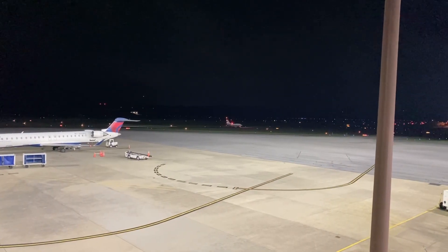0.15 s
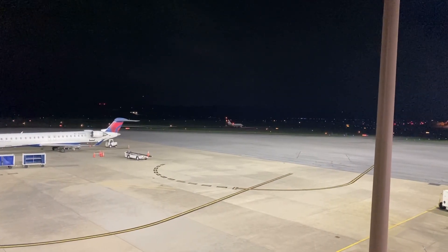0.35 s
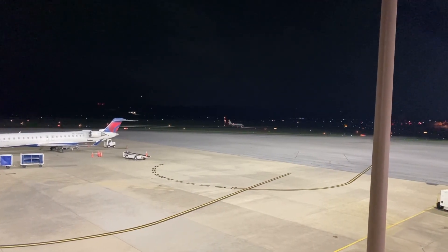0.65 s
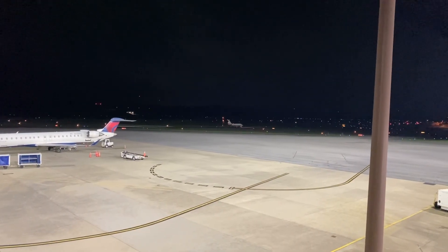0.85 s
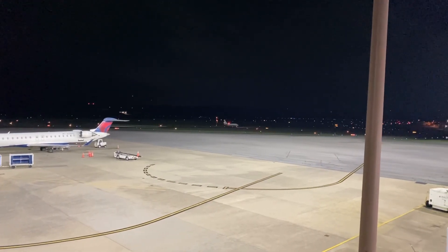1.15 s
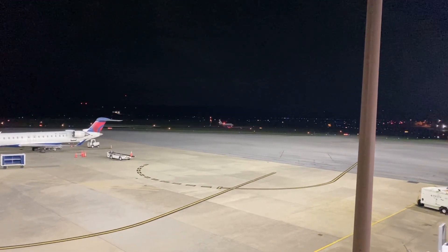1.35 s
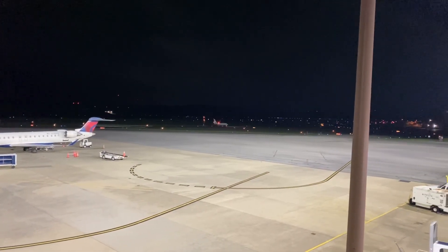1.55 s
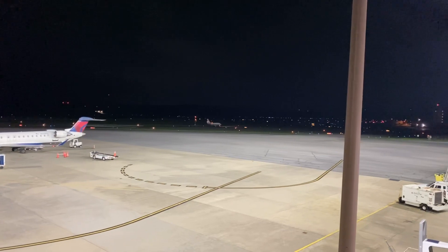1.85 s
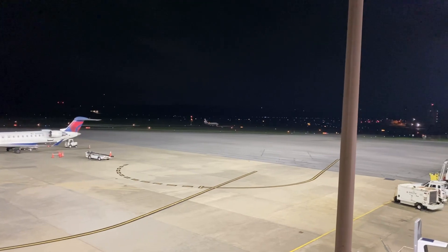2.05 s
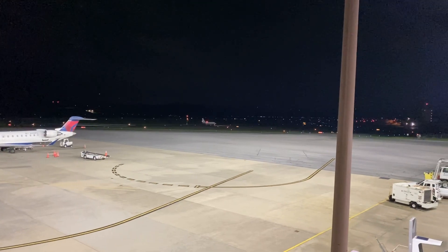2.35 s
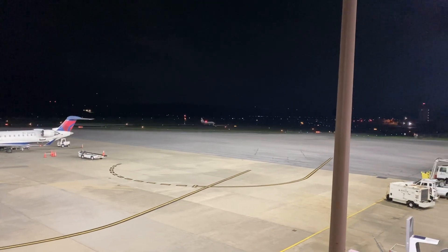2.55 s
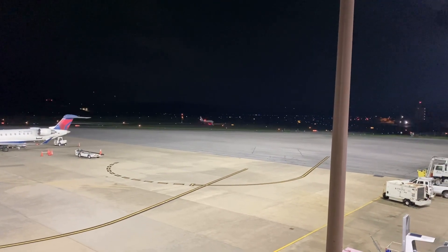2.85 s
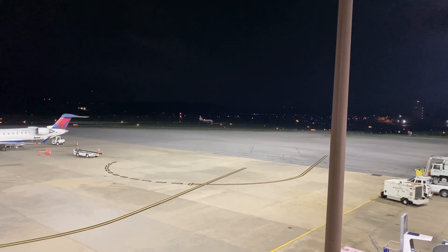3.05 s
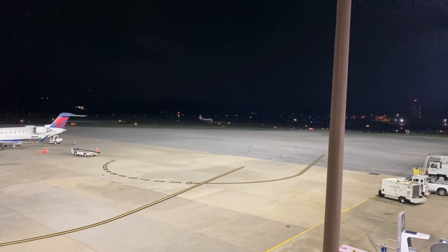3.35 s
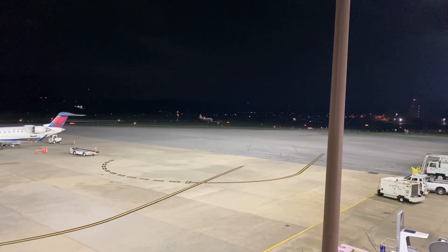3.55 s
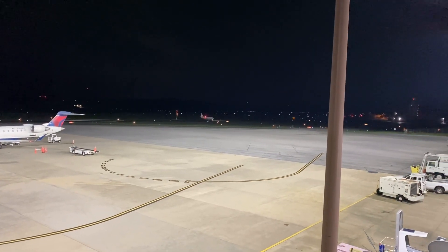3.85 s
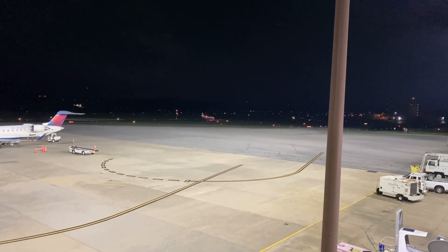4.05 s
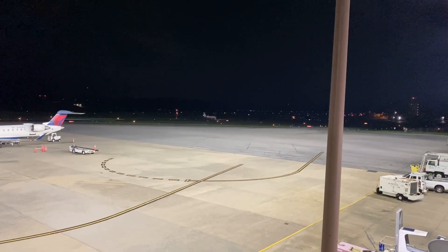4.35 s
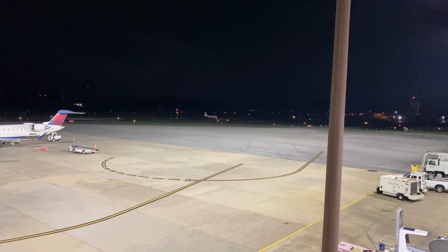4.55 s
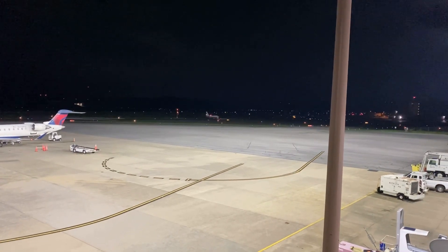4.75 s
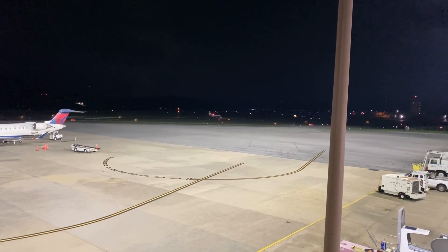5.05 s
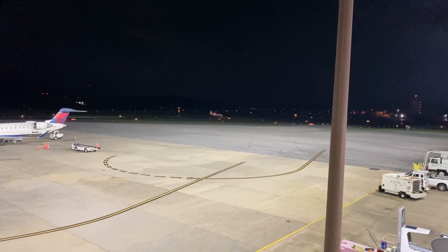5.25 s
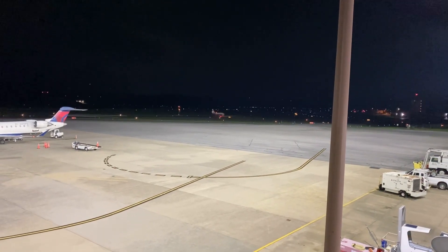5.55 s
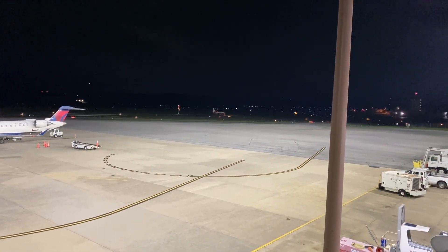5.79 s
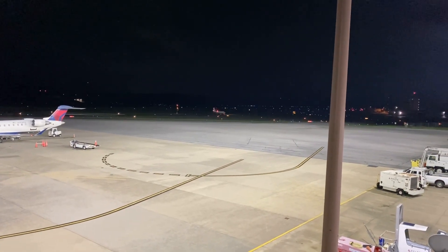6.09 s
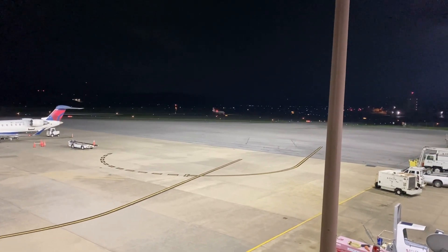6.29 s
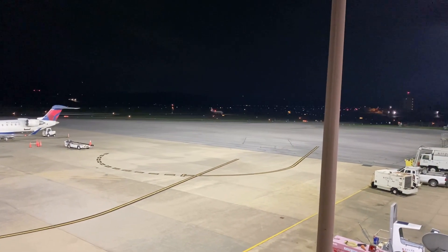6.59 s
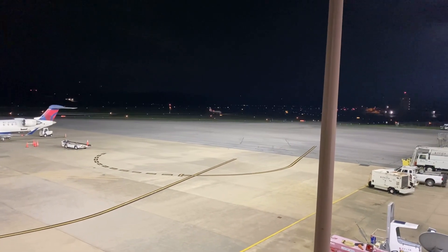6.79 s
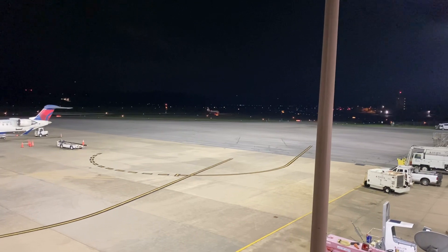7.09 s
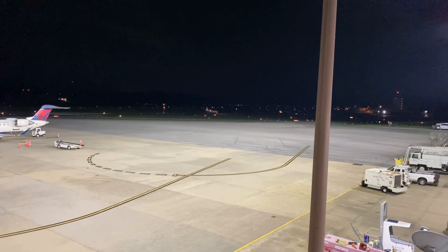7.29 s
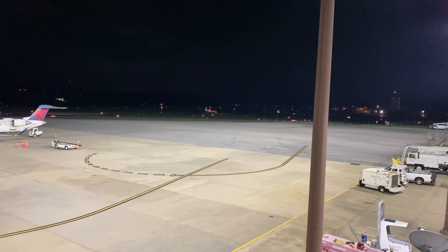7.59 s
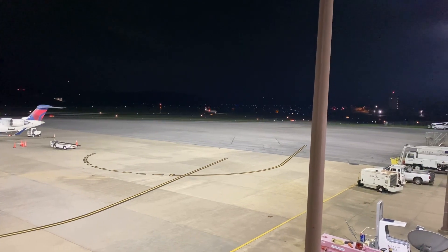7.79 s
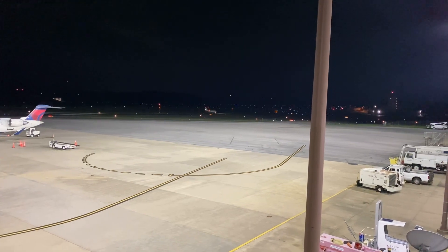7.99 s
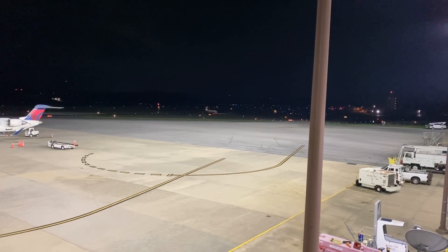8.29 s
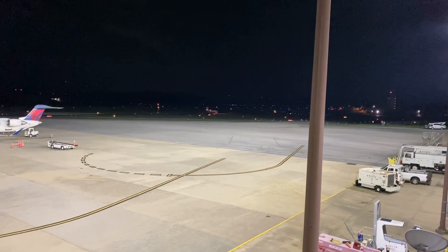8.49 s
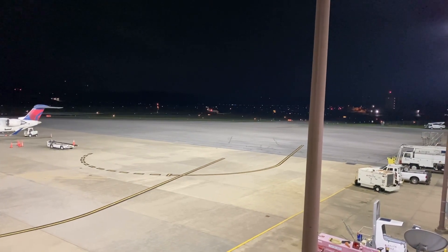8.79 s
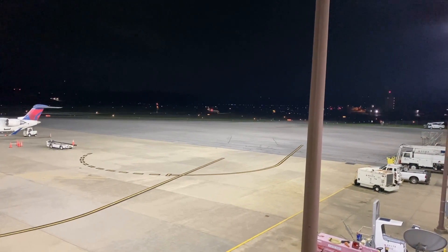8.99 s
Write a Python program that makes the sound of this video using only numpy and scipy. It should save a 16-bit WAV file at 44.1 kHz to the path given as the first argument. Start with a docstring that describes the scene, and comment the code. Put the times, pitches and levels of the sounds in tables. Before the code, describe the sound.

Steady exhaust noise from far-off parked jets, heard on a phone. A loud, stuttering whine opens the scene and fades within a second into sinking hiss; a faint handling bump follows. High whistling drifts in and out over the rush. Midway the whine chirps up again for an instant, hiss climbs, and the engines continue without a clear ending.

```python
"""Idling jet engines

Jet engines idle far off on an airport apron, heard by a phone. Exhaust noise, shaped in bands, rushes on.
A fan whine and a high turbine whistle, both tones with wavering levels, swell and fade in the moving air.
Twice the fan whine flares up, flutters and rasps. Sliding bands of noise make hiss: one sinks after the
first flare, one climbs after the second. Puffs of noise, faint gliding streaks and one soft bump join in.
"""
import sys
import numpy as np
from scipy import signal
from scipy.fft import rfft, irfft, next_fast_len
from scipy.io import wavfile
from scipy.ndimage import map_coordinates

SR = 44100
rng = np.random.default_rng(int(sys.argv[2]) if len(sys.argv) > 2 else 0)


def generate_wav(sig):
    """Save sig (samples, or channels by samples) to the path in sys.argv[1] as 16-bit PCM at SR."""
    pcm = np.round(np.clip(np.atleast_2d(sig).T, -1, 1) * 32767).astype(np.int16)
    wavfile.write(sys.argv[1], SR, pcm)


N = 402633
T = np.arange(N) / SR
COARSE_T = T[::32]  # slow level curves are worked out here, then joined by straight lines

# colour of the exhaust rush, before its overall level is set: (f/Hz, relative level per Hz/dB)
RUSH = [(25, -28), (85, -15), (150, -3.5), (270, -0.5), (390, -3), (720, -1.5), (1250, -5.5), (1650, -3),
        (3100, -2.5), (4150, -4.5), (4750, -10.5), (6300, -12), (8200, -22), (11000, -39.5)]
# rise and fall of the rush: (t/s, body level/dB, treble level/dB)
FLOW = [(0, 0, 0.5), (.35, 1, 1), (.65, 0.5, 3), (2.0, -1.5, -1.5), (3.8, -1, 1), (4.55, -0.5, 1),
        (4.8, -0.5, -5), (5.25, 0.5, -4.5), (5.6, 0, 1.7), (7.5, -1.3, -0.5), (9.13, -2.5, 2)]
# extra rise and fall of the rush's middle: (t/s, level/dB)
MIDDLE = [(0, .8), (1.7, 1), (2.2, -1), (4.1, -2), (4.6, -0.5), (8.2, 0.5), (9.13, 2)]
MIDDLE_HZ, MIDDLE_OCTAVES = 1250, 0.35  # centre and half-width of that middle

# brief whistling streaks in the rush: pitch range, then the usual level and its spread
STREAK_LOW_HZ, STREAK_HIGH_HZ, STREAK_DB, STREAK_SPREAD_DB = 2103, 4302, -63, 3
STREAK_HALF_S, STREAK_GLIDE_HZ_PER_S = 0.015, 1200  # typical half-length, spread of the glides

# gusts of sliding hiss: (middle t/s, level/dB, half-length/s, from f/Hz, to f/Hz, slide time/s)
SWISHES = [(0.682, -56, 0.18, 2294, 1300, .3), (5.62, -54, 0.84, 1596, 3305, .3)]
# thin top hiss that comes in late: (middle t/s, level/dB, half-length/s)
SIZZLE_SWELL = [(8.3, -73, 0.94)]
# short puffs of noise: (middle t/s, level/dB, centre f/Hz, width f/Hz, half-length/s)
PUFFS = [(0.147, -49.5, 750, 340, 0.044), (0.482, -42, 2200, 260, .011), (.578, -48, 2280, 220, 0.015),
         (0.647, -50.5, 780, 280, 0.015), (0.832, -49, 960, 220, .009), (1.008, -47, 1450, 220, .005),
         (1.028, -43, 746, 199, .0063), (4.503, -50, 1580, 300, .018), (4.486, -50.5, 2740, 260, .008),
         (4.445, -48, 1950, 260, .008), (4.6, -48, 2050, 420, .03), (5.339, -46, 1880, 200, .008),
         (5.588, -48, 2630, 380, 0.026), (5.633, -49, 765, 150, .015), (5.855, -53, 786, 168, 0.018),
         (6.105, -35, 3170, 260, 0.003), (6.115, -43, 3180, 520, .014), (6.13, -45, 2650, 200, .008),
         (6.22, -48.5, 3050, 700, .025), (6.448, -42.5, 3050, 200, .007)]
# dull modes of a soft bump of the hand on the phone: (f/Hz, level/dB)
BUMP_MODES = [(40, -66), (80, -65), (135, -51), (175, -44)]
BUMP_S, BUMP_HALF_S = 1.649, .009

# weaker machine tones: (f/Hz, level/dB, half-width of the line f/Hz)
TONES = [(161.8, -72.5, 14), (214.5, -71.5, 9), (265.4, -68.5, 7.4), (534.5, -67.5, 12), (712.5, -64.5, 33),
         (994, -67.5, 57), (1415, -67.5, 50), (2825, -68.5, 9)]
# low hum that stands out for a while: (middle t/s, level/dB, half-length/s)
HUM_SWELL = [(5.85, -60.5, 0.7)]
HUM_HZ, HUM_DB = 769, -67.5
# two close whines that beat together: (f/Hz, usual level/dB, share of each spell: level/dB)
PAIR_WHINES = [(3133, -62, -7.5), (3170, -71.5, -2)]
# spells in which the wind carries that pair over: (start t/s, length/s, level before the share/dB)
PAIR_SPELLS = [(.92, 0.17, -52.5), (5.68, 0.27, -55), (6.02, .075, -46), (6.28, .07, -50), (6.41, .05, -51),
               (6.49, 0.061, -47), (6.67, 0.074, -54), (7.02, 0.17, -53), (7.4, 0.68, -59.5),
               (8.45, 0.32, -60)]

# turbine whistle: its pitch, and the shaft rate that spaces its sidebands
WHISTLE_HZ, SHAFT_HZ = 5071.5, 710.5
# level between swells, spread of its random fading, fades a second
WHISTLE_DB, WHISTLE_FADE_DB, WHISTLE_FADES_PER_S = -53.5, 0.5, 13
# spells in which the wind carries the whistle over: (start t/s, length/s, level/dB)
WHISTLE_SWELLS = [(.15, 0.086, -42.5), (.26, 0.071, -51), (.468, 0.024, -39), (.58, 0.15, -58),
                  (1.02, .05, -55), (1.38, 0.069, -51.5), (1.69, 0.042, -41), (1.96, 0.069, -47),
                  (2.3, 0.32, -49.5), (2.88, 0.3, -44), (3.38, 0.043, -56), (3.62, 0.11, -65),
                  (4.13, 0.19, -52), (4.68, 0.36, -48), (5.12, 0.2, -46), (5.38, 0.19, -54),
                  (5.72, 0.2, -47), (6.12, 0.073, -48), (6.55, 0.55, -58.5), (7.17, 0.15, -54.5),
                  (7.41, 0.062, -52), (7.59, 0.077, -61), (7.78, .19, -51), (8.11, 0.061, -55),
                  (8.28, .06, -67), (8.74, 0.16, -55.5)]
# the whistle drops out briefly when its paths cancel: (t/s, change in level/dB)
DROPOUTS = [(.05, -10), (.95, -8), (1.14, -15), (1.3, -9), (1.52, -12), (1.88, -15), (2.17, -15), (3.3, -8),
            (3.53, -9), (3.83, -15), (4.4, -13), (4.48, -10), (4.54, -5), (7.35, -3), (7.54, -3),
            (8.04, -12), (8.21, -6), (8.4, -6), (8.52, -6), (8.69, -9), (9.03, -13)]
# noisy skirt that the air spreads round the whistle: (width f/Hz, level relative to the tone/dB)
WHISTLE_SKIRT = [(70, -11.5), (240, -15)]
# the whistle's sidebands: (shaft rates above it, usual level/dB)
SIDEBANDS = [(-1, -63.5), (1, -66.5)]
SIDEBAND_FADE_DB, SIDEBAND_FADES_PER_S = 1, 4
# the sidebands swell by themselves: (shaft rates above the whistle, start t/s, length/s, level/dB)
SIDEBAND_SWELLS = [(-1, 0.43, .3, -63), (1, .5, 0.2, -58.5), (-1, 1.33, .15, -61), (-1, 2.6, .35, -64),
                   (1, 2.64, 0.13, -58), (1, 3.01, 0.24, -59), (-1, 3.52, .65, -56.5),
                   (1, 3.55, 0.45, -63.5), (-1, 4.4, .13, -58), (1, 5.38, 0.16, -58), (-1, 5.45, 0.13, -62),
                   (-1, 5.8, 0.23, -60), (-1, 6.88, 0.19, -56.5), (-1, 6.9, .18, -59),
                   (1, 7.62, 0.98, -64.5), (-1, 7.9, 0.23, -55), (-1, 8.3, .08, -58), (-1, 8.56, .14, -60)]
# tones of a second blade row: (shaft rates above its own pitch, relative level/dB)
ROW = [(-1, -3), (0, -0.5), (1, -17.5), (2, -14.5)]
ROW_HZ, ROW_DB = 7876, -74  # its pitch, and its level between swells before the relative levels
# swells of the second row, before the relative levels: (start t/s, length/s, level/dB)
ROW_SWELLS = [(.78, .14, -75), (2.0, .04, -65), (2.7, .09, -66), (3.1, .07, -67), (5.13, 0.091, -72),
              (7.18, .04, -65), (8.05, 0.087, -71), (8.44, 0.31, -64)]

# side tones that flare beside the fan whine, a rasp: (start t/s, length/s, f/Hz, level/dB)
RASPS = [(.04, 0.19, 2154, -54), (.2, .04, 2440, -54), (.278, .06, 1954, -43.5), (.365, .02, 2150, -46),
         (.42, .025, 2530, -52), (.455, .035, 2160, -41), (.47, 0.026, 2330, -47), (.5, 0.1, 2180, -48),
         (.59, .025, 1416, -51), (4.47, .05, 1420, -52), (4.482, .06, 2600, -52), (4.57, 0.077, 2600, -56),
         (4.57, .12, 1404, -57.5)]
# fan blade-passing rate, drifting slowly: (t/s, f/Hz)
FAN_PITCH = [(0, 2036), (2.2, 2045), (4.6, 2028), (7.3, 2015), (8.4, 2026), (9.13, 2027)]
# level between swells, spread of its random fading, fades a second
FAN_DB, FAN_FADE_DB, FAN_FADES_PER_S = -59, 2, 6
# spells in which the wind carries the fan whine over: (start t/s, length/s, level/dB)
FAN_SWELLS = [(.01, .155, -33), (.17, .09, -36.5), (.312, 0.052, -32), (.405, .08, -33), (.5, 0.098, -36.5),
              (.61, 0.024, -40.5), (.65, 0.079, -49.5), (1.25, .09, -57), (2.3, 0.31, -51.5),
              (2.82, 0.23, -57.5), (3.57, 0.24, -51.5), (3.97, 0.15, -56), (4.35, 0.43, -50.5),
              (4.433, 0.021, -36), (4.474, 0.064, -33.5), (4.575, 0.089, -37.5), (4.695, .03, -44),
              (4.725, 0.041, -40), (4.79, 0.026, -48.5), (5.053, 0.62, -51.5), (6.798, 0.7, -56),
              (7.6, 0.22, -50.5), (8.15, 0.29, -51)]
# eddies focus the fan whine for an instant: (middle t/s, level/dB)
FLARES = [(.055, -28), (.138, -37), (.198, -33), (.28, -35), (.292, -32), (.318, -33), (.343, -30),
          (.375, -31), (.427, -28), (.442, -29), (.457, -31), (.468, -23.8), (.476, -28), (.486, -30),
          (.574, -33), (4.443, -30), (4.503, -38), (4.516, -35), (4.578, -29.5), (4.607, -27),
          (4.646, -29.5), (4.761, -39)]
# the fan whine stutters too, more quickly: (t/s, change in level/dB)
FAN_DROPOUTS = [(.072, 0), (.181, 0), (.269, -10), (.305, -8), (.392, -1), (.499, -2), (4.463, -1),
                (4.556, -2), (4.594, -7), (4.628, -5), (4.677, -9), (4.78, -8)]
# noisy skirt that the air spreads round the fan whine: (width f/Hz, level relative to the tone/dB)
FAN_SKIRT = [(130, -21), (380, -21)]
FLARE_HALF_S, DROPOUT_HALF_S, FAN_DROPOUT_HALF_S = 0.0052, .02, .0038
# eddies shake the fan whine's pitch: spread, shakes a second
FAN_JITTER_HZ, FAN_JITTERS_PER_S = 11, 190

# rise and fall time of a spell: (shortest/s, added share of the spell's length)
FAN_EDGE, WHISTLE_EDGE = (0.0042, 0.092), (0.026, 0.078)
SIDEBAND_EDGE, PAIR_EDGE, RASP_EDGE = (0.042, .1), (.012, .1), (0.0045, 0)
TOP_HZ = 10950  # the phone passes sound up to here


def undb(db):
    """Turn decibels into gain."""
    return np.exp(np.asarray(db) * (np.log(10) / 20))


def unit(x):
    """Scale to an rms (average strength) of 1."""
    return x * np.sqrt(len(x) / np.vdot(x, x).real)


def curves(table):
    """Join each column of a time table by straight lines."""
    times, *columns = np.transpose(table)
    return [np.interp(T, times, column) for column in columns]


def bell(x, centre, half):
    """Rounded (Gaussian) swell of height 1."""
    return np.exp(-.5 * np.minimum(((x - centre) / half) ** 2, 100))


def walk(rate):
    """Smooth random wandering with spread 1, built from about `rate` chance values a second."""
    points = rng.standard_normal(8192)
    steps = np.arange(0, N + 32, 32)
    smooth = map_coordinates(points, [steps / SR * rate], order=3, mode="wrap")
    return unit(np.interp(np.arange(N), steps, smooth))


def scatter(width_hz):
    """Random turning of level and phase spreads a tone into a band about this wide, up to some 1400 Hz."""
    return unit(walk(width_hz) + 1j * walk(width_hz))


def twinkle(width_hz, steady=0.68):
    """Envelope of a tone whose direct path and many scattered paths add up; rms 1."""
    return unit(steady + scatter(width_hz))


def through_air(skirt, flutter_db, flutter_rate):
    """Envelope of a tone that crossed turbulent air: its level flutters and it gains a noisy skirt."""
    direct = unit(undb(flutter_db * walk(flutter_rate)))
    return unit(direct + sum(undb(db) * scatter(width) for width, db in skirt))


def carry(envelope, hz):
    """Put a complex envelope on a steady or gliding pitch, keeping its rms."""
    turns = np.cumsum(hz + np.zeros(N)) / SR
    phase = (2 * np.pi * (turns - np.floor(turns))).astype(np.float32)
    return np.sqrt(2) * (envelope.real * np.cos(phase) - envelope.imag * np.sin(phase))


def dips(table, half):
    """Gain of a tone that drops out for an instant now and then."""
    change_db = sum(db * bell(COARSE_T, s, half) for s, db in table)
    return undb(np.interp(T, COARSE_T, change_db))


def swells(usual_db, table):
    """Gain of a sound that rests at a usual level and rises in rounded swells; their powers add."""
    power = sum((undb(db) * bell(COARSE_T, s, half)) ** 2 for s, db, half in table)
    return np.sqrt(undb(usual_db) ** 2 + np.interp(T, COARSE_T, power))


def carried(table, edge):
    """Gain of a tone that the wind carries over in spells: each rises, holds and dies away."""
    shortest, share = edge
    spells = []
    for start, length, db in table:
        outside = abs(COARSE_T - start - length / 2) - length / 2  # seconds before or after the hold
        fade = np.clip(outside / (shortest + share * length), 0, 20)
        spells.append(undb(db) * np.exp(-fade))
    return np.interp(T, COARSE_T, np.max(spells, axis=0))


def rush(body_db=-48, flicker_db=1.06, drift_db=.5, treble_flutter_db=0.7, crossover_hz=4600):
    """Exhaust turbulence: noise in half-octave bands that swell together but drift and flicker alone."""
    body, treble = curves(FLOW)
    (middle,) = curves(MIDDLE)
    treble = treble + treble_flutter_db * walk(22)
    hz, db = np.transpose(RUSH)
    size = next_fast_len(N, real=True)
    freqs = np.maximum(np.arange(size // 2 + 1) * SR / size, 1)
    colour = undb(np.interp(np.log(freqs), np.log(hz), db))
    spectrum = rfft(rng.standard_normal(size)) * colour
    spectrum /= np.std(irfft(spectrum, size))
    band_of = np.floor(2 * np.log2(np.maximum(freqs, 100)))  # the lowest pitches share one band
    out = np.zeros(N)
    for band in np.unique(band_of):
        octave = (band + .5) / 2
        high = 1 / (1 + (crossover_hz / 2 ** octave) ** 4)  # 0 in the body, 1 in the treble
        swell = (1 - high) * body + high * treble
        swell = swell + middle * bell(octave, np.log2(MIDDLE_HZ), MIDDLE_OCTAVES)
        swell = swell + flicker_db * walk(16) + drift_db * walk(2.015)
        out = out + irfft(spectrum * (band_of == band), size)[:N] * undb(swell)
    return out * undb(body_db)


def streaks(count=420):
    """Scraps of blade noise that the air lets through for an instant, each a faint gliding tone."""
    out = np.zeros(N)
    chances = zip(rng.random((count, 3)), rng.standard_normal((count, 3)))
    for (when, pitch, turn), (size, glide, stretch) in chances:
        span = slice(max(int(when * N) - SR // 10, 0), int(when * N) + SR // 10)
        t = T[span] - when * N / SR
        hz = STREAK_LOW_HZ + pitch * (STREAK_HIGH_HZ - STREAK_LOW_HZ)
        turns = turn + hz * t + glide * STREAK_GLIDE_HZ_PER_S * t ** 2 / 2
        tone = np.sqrt(2) * np.sin(2 * np.pi * turns)
        gain = undb(STREAK_DB + STREAK_SPREAD_DB * size)
        out[span] += gain * bell(t, 0, STREAK_HALF_S * np.exp(0.23 * stretch)) * tone
    return out


def swish(core_hz=600, wide_hz=1600, wide_share=4.3, gust_db=2.0,
          top_hz=8600, top_width_hz=1100, top_gust_db=-1.0):
    """Gusty noise gathered round a sliding pitch, with a thin sizzle high above it near the end."""
    band = unit(scatter(core_hz) + wide_share * scatter(wide_hz)) * undb(gust_db * walk(25))
    sizzle_gain = swells(-94, SIZZLE_SWELL) * undb(top_gust_db * walk(6))
    out = carry(sizzle_gain * scatter(top_width_hz), top_hz)
    for s, db, half, from_hz, to_hz, slide in SWISHES:
        hz = from_hz + (to_hz - from_hz) * (1 + np.tanh((T - s) / slide)) / 2
        out += carry(undb(db) * bell(T, s, half) * band, hz)
    return out


def puffs():
    """Brief swells of noise, each filtered by one broad, steep-sided resonance."""
    out = np.zeros(N)
    size = 16384
    freqs = np.arange(size // 2 + 1) * SR / size
    for s, db, hz, width, half in PUFFS:
        start = max(int(s * SR) - size // 2, 0)
        shape = bell(T[start:start + size], s, half)
        resonance = 1 / (1 + ((freqs - hz) / width) ** 2) ** 2
        burst = shape * irfft(rfft(rng.standard_normal(size)) * resonance)
        out[start:start + size] += undb(db) * unit(burst) * np.sqrt(np.mean(shape ** 2))
    return out


def bump():
    """One low, heavily damped thud through the phone's body: a few low tones in one short swell."""
    ring = sum(undb(db) * np.sqrt(2) * np.sin(2 * np.pi * hz * (T - BUMP_S)) for hz, db in BUMP_MODES)
    return ring * bell(T, BUMP_S, BUMP_HALF_S)


def tones(steady=0.41, pair_width_hz=75, pair_steady=.9, hum_steady=0.6):
    """Lesser machine tones, mostly scattered on the way, so each fades on its own; a close pair has spells."""
    out = carry(swells(HUM_DB, HUM_SWELL) * twinkle(22, hum_steady), HUM_HZ)
    spells = carried(PAIR_SPELLS, PAIR_EDGE)
    for hz, db, share_db in PAIR_WHINES:
        strength = np.hypot(undb(db), undb(share_db) * spells)
        out += carry(strength * twinkle(pair_width_hz, pair_steady), hz)
    for hz, db, half_width in TONES:
        out += carry(undb(db) * twinkle(2 * half_width, steady), hz)
    return out


def whistle(flutter_db=0.23, sideband_hz=70, row_hz=34, row_fade_db=1.5, octave_db=-43):
    """The turbine's high, nearly pure tones; each blade row has sidebands spaced by the shaft rate."""
    speed = 1 + .0004 * walk(5)  # the pitches waver together
    fading = undb(WHISTLE_DB + WHISTLE_FADE_DB * walk(WHISTLE_FADES_PER_S))
    strength = np.hypot(fading, carried(WHISTLE_SWELLS, WHISTLE_EDGE)) * dips(DROPOUTS, DROPOUT_HALF_S)
    envelope = strength * through_air(WHISTLE_SKIRT, flutter_db, 36)
    out = carry(envelope, WHISTLE_HZ * speed)
    out += undb(octave_db) * carry(envelope, 2 * WHISTLE_HZ * speed)
    for side, side_db in SIDEBANDS:
        fading = undb(side_db + SIDEBAND_FADE_DB * walk(SIDEBAND_FADES_PER_S))
        own_swells = [row for which, *row in SIDEBAND_SWELLS if which * side > 0]
        strength = np.hypot(fading, carried(own_swells, SIDEBAND_EDGE))
        out += carry(strength * twinkle(sideband_hz, 1.3), (WHISTLE_HZ + side * SHAFT_HZ) * speed)
    row_gain = np.hypot(undb(ROW_DB), carried(ROW_SWELLS, WHISTLE_EDGE))
    for step, step_db in ROW:
        strength = row_gain * undb(step_db + row_fade_db * walk(6.4))
        out += carry(strength * twinkle(row_hz, 1.4), (ROW_HZ + step * SHAFT_HZ) * speed)
    return out


def rasp(width_hz=130, steady=0.95, waver_hz=18):
    """Short-lived, wavering side tones round the fan whine, rough because they beat with it."""
    out = np.zeros(N)
    for start, length, hz, db in RASPS:
        strength = carried([(start, length, db)], RASP_EDGE)
        out += carry(strength * twinkle(width_hz, steady), hz + waver_hz * walk(50))
    return out


def fan(haze_db=-29, haze_hz=1400, flutter_db=.8, flutter_rate=170, waver_hz=4):
    """Blade-passing tone that swells on the wind; eddies make it flare and flutter in a noisy haze."""
    (hz,) = curves(FAN_PITCH)
    hz = hz + waver_hz * walk(12) + FAN_JITTER_HZ * walk(FAN_JITTERS_PER_S)
    usual_db = FAN_DB + FAN_FADE_DB * walk(FAN_FADES_PER_S)
    flaring = swells(usual_db, [(s, db, FLARE_HALF_S) for s, db in FLARES])
    strength = np.hypot(carried(FAN_SWELLS, FAN_EDGE), flaring)
    strength = strength * dips(FAN_DROPOUTS, FAN_DROPOUT_HALF_S)
    flutter = through_air(FAN_SKIRT, flutter_db, flutter_rate)
    haze = undb(haze_db) * scatter(haze_hz)
    return carry(strength * (flutter + haze), hz)


def scene():
    """Add all the engines' parts and the bump, in one channel."""
    background = rush() + streaks() + swish() + puffs() + bump()
    machines = tones() + whistle() + rasp() + fan()
    return (background + machines)[None]


def record(dry):
    """The phone cuts the top steeply."""
    return signal.sosfilt(signal.ellip(10, .2, 60, TOP_HZ, fs=SR, output="sos"), dry)


dry = scene()
out = record(dry)
generate_wav(out)
```